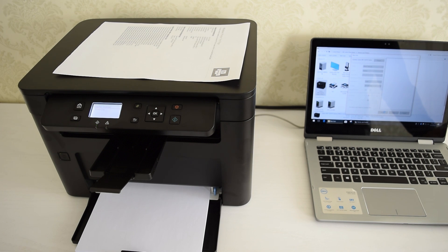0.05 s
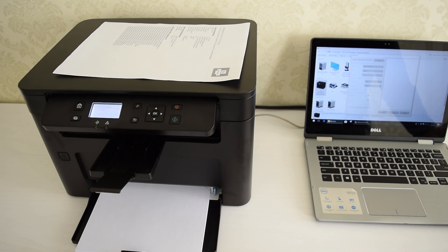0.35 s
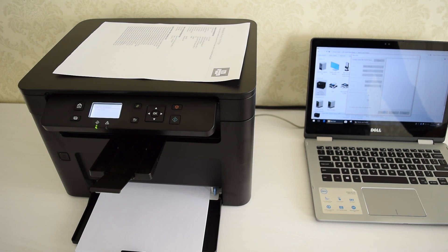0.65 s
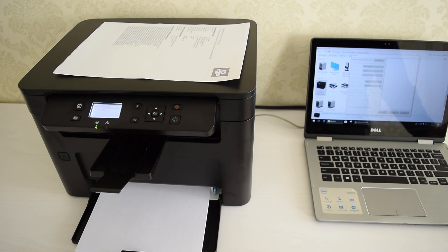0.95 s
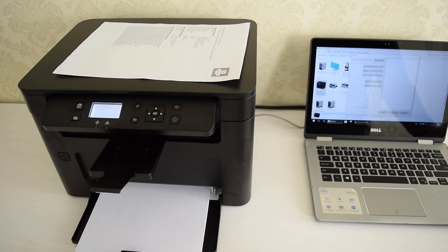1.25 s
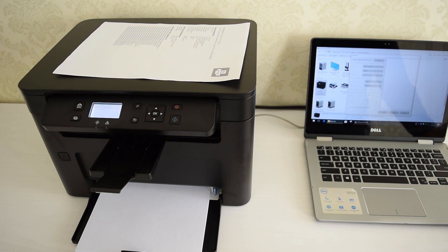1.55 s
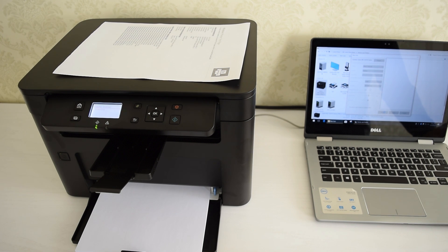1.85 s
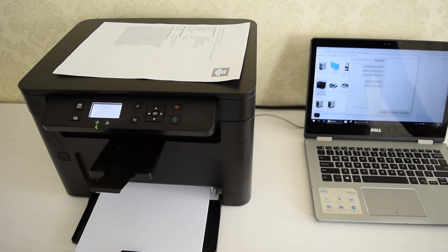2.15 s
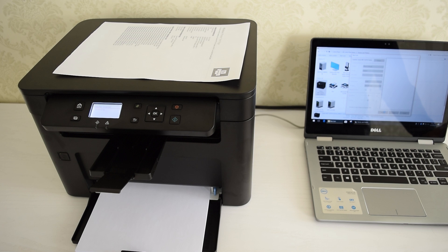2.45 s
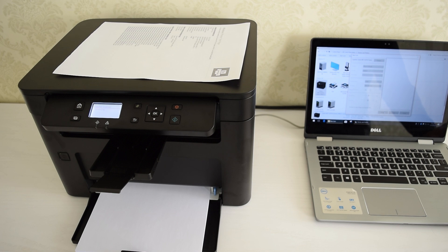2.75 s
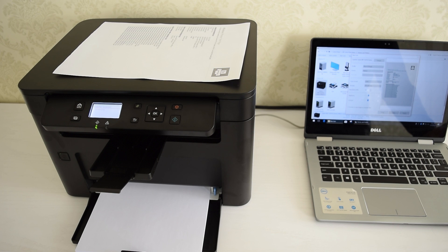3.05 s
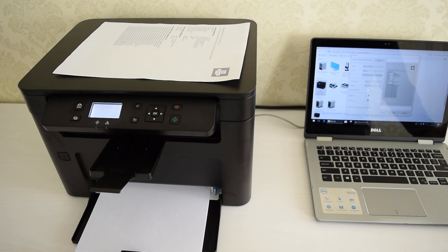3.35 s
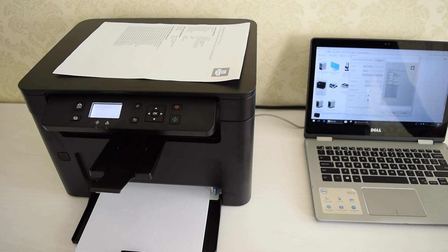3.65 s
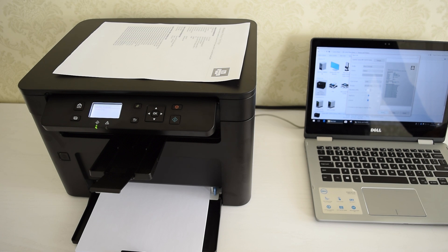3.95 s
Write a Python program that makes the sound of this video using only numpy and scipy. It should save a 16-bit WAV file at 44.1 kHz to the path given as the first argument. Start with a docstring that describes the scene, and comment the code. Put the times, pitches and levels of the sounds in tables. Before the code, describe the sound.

A desktop printer's scanner motor whines steadily over a light gear rattle. It brakes with two plastic clunks, then starts again with a lower, throbbing whir. The printer is straight ahead in a quiet room.

```python
"""A desktop printer moves its scanner carriage with a stepper motor, in a quiet room.
First the motor whines at twice its step rate over rubbing, scuffs and a gear rattle that repeats each turn.
At 1.65 s it brakes with a falling chirp; the slack gears jolt and the drive clunks twice.
From 1.8 s it chirps up to a faster, lower-sounding whir that throbs over a drone to the end.
The plastic case colours the rattle and rings under the knocks."""
import sys
import numpy as np
from scipy import signal
from scipy.fft import rfft, irfft
from scipy.io import wavfile
from scipy.ndimage import uniform_filter1d, map_coordinates

SR = 44100
rng = np.random.default_rng(int(sys.argv[2]) if len(sys.argv) > 2 else 0)


def bounce(signal):
    """Save signal as a 16-bit WAV file at the path given by the first command-line argument."""
    frames = np.transpose(np.atleast_2d(signal))
    limited = np.clip(frames, -1, 1)
    pcm = np.round(limited * 32767).astype(np.int16)
    wavfile.write(sys.argv[1], SR, pcm)


N = 176400
T = np.arange(N) / SR

SLOW_STEP_HZ, FAST_STEP_HZ, BRAKE_S = 1007.6, 1469.2, 1.649
STEPS_PER_TURN, BEATS_PER_TURN, FLUTTER_HZ = 127.16, 6, 44.8
# motor runs (start [s], run-up [s], brake at [s], braking [s], step rate [Hz])
SLOW_RUN = (-1, .05, BRAKE_S, .033, SLOW_STEP_HZ)
FAST_RUN = (1.785, .079, 5, .03, FAST_STEP_HZ)


def amp(db):
    """Decibels to gain."""
    return 10 ** (np.asarray(db) / 20)


def unit_rms(x):
    """Scales to an rms of one."""
    return x / np.sqrt(np.mean(x ** 2) + 1e-20)


def curve(rows, column=1):
    """One column of a time table, at every sample."""
    rows = np.array(rows)
    return np.interp(T, rows[:, 0], rows[:, column])


def colour(x, points):
    """Filters by (frequency [Hz], gain [dB]) points."""
    hz, db = np.transpose(points)
    bins_hz = np.fft.rfftfreq(2 * N, 1 / SR)
    gain = amp(np.interp(np.log(bins_hz + 1), np.log(hz), db))
    return irfft(rfft(x, 2 * N) * gain)[:N]


def radiate(drive, points):
    """Gives a white drive a spectral density in dB/Hz."""
    return colour(drive, points) * np.sqrt(SR / 2)


def wander(hz):
    """Unit-rms random drift, low-passed at hz."""
    rolloff = 1 + (np.fft.rfftfreq(N, 1 / SR) / hz) ** 4
    return unit_rms(irfft(rfft(rng.standard_normal(N)) / rolloff, N))


def motion(start_s, run_up_s, brake_s, braking_s, step_hz):
    """Fraction of full speed, and steps made so far."""
    speed = np.clip((T - start_s) / run_up_s, 0, 1) * np.clip(1 - (T - brake_s) / braking_s, 0, 1)
    return speed, np.cumsum(speed) * step_hz / SR


def tone(cycles, db, waver=0.18):
    """A partial fluttering in level and phase."""
    flutter = 1 + waver * (wander(FLUTTER_HZ) + 1j * wander(FLUTTER_HZ))
    return np.sqrt(2) * amp(db) * (flutter * np.exp(2j * np.pi * (cycles + rng.random()))).real


def tones(cycles, table):
    """Partials locked to one rotation."""
    return sum(tone(order * cycles, db) for order, db in table.items())


def ring(age_s, hz, db, t60_s):
    """One decaying mode, random phase."""
    return amp(db - 60 * age_s / t60_s) * np.sin(2 * np.pi * (hz * age_s + rng.random()))


def reverb(x, t60_s):
    """Diffuse room tail of unit energy."""
    t = T[:SR // 2]
    tail = rng.standard_normal(len(t)) * amp(-60 * t / t60_s)
    return signal.fftconvolve(x, tail / np.linalg.norm(tail))[:N]


# room noise (frequency [Hz], density [dB/Hz])
ROOM_SPECTRUM = [(25,-130),(50,-119),(100,-116),(150,-108),(400,-108),(1200,-99),(3000,-108),(8000,-124),(14000,-145)]
def room():
    """Steady, faint air noise."""
    return radiate(rng.standard_normal(N), ROOM_SPECTRUM)


# sliding friction (frequency [Hz], gain [dB])
RUB_EQ = [(2500,-26),(3300,-0.5),(3900,10.5),(4600,-4),(5800,-12.5),(7700,-21),(8450,-16),(9500,-20),(12000,-39)]
def carriage_rub(base_db=-58.5, swing=0.94, fade_db_per_s=6):
    """Rubbing hiss that swells with the whine and fades steadily."""
    whine_db = curve(WHINE_LEVELS)
    level_db = base_db + swing * (whine_db - whine_db.max()) - fade_db_per_s * T
    return amp(level_db) * unit_rms(colour(rng.standard_normal(N), RUB_EQ))


# carriage scuffs (time [s], level [dB])
SCUFFS = [(.03,-72),(.062,-63),(.29,-71.5),(.41,-66),(.445,-71.5),(0.539,-66.5),(0.686,-80.5),(.81,-69.5),(.93,-70),(1.185,-72.5),(1.305,-72.5),(1.44,-75.5)]
# scuff noise (frequency [Hz], gain [dB])
SCUFF_EQ = [(2500,-16.5),(3800,5.5),(5200,-1.5),(8400,-0.5),(9500,-8),(12000,-23)]
def carriage_scuffs(sigma_s=0.011):
    """Brief contacts in the slow run, each a bright swell of noise."""
    contact = sum(amp(db) * np.exp(-((T - at_s) / sigma_s) ** 2 / 2) for at_s, db in SCUFFS)
    return contact * unit_rms(colour(rng.standard_normal(N), SCUFF_EQ))


def rattle(steps, step_hz, repeat, throb, beat, grit, slip_steps=0.019, bind_turn=.49, churn_hz=9):
    """Tooth flanks scrape and tick in a pattern that returns each turn, over fresh friction noise."""
    size = int(STEPS_PER_TURN / step_hz * SR)
    turns = steps / STEPS_PER_TURN
    flanks = unit_rms(rng.standard_normal(size) * np.exp(grit * np.clip(rng.standard_normal(size), -2, 2)))
    place = (turns + slip_steps * wander(FLUTTER_HZ) / STEPS_PER_TURN) * size
    pattern = map_coordinates(flanks, [place % size], order=3, mode="grid-wrap")
    drive = np.sqrt(repeat) * pattern + np.sqrt(1 - repeat) * rng.standard_normal(N)
    # no two turns bind alike: angle and depth drift
    angle = 2 * np.pi * (turns - bind_turn + .08 * wander(churn_hz))
    bind = throb * (1 + .35 * wander(churn_hz)) * np.cos(angle)
    churn = .035 * wander(churn_hz)
    return drive * (1 + bind + churn) * (1 + beat * np.cos(BEATS_PER_TURN * angle))


# slow rattle through the case (frequency [Hz], density [dB/Hz])
SLOW_RATTLE_SPECTRUM = [(25,-130),(100,-115),(150,-101),(215,-108),(285,-101),(350,-102),(450,-91),(560,-96),(720,-92),(830,-93.5),(1050,-88),(1550,-87),(2000,-80),(2380,-85),(2750,-92),(3050,-93),(3300,-99),(3800,-99.5),(4600,-107),(5800,-114),(8450,-115),(11000,-124),(13000,-142)]
def slow_gears():
    """Light gear rattle, radiated by the case."""
    drive = rattle(SLOW_STEP_HZ * T, SLOW_STEP_HZ, repeat=0.62, throb=0.13, beat=0.17, grit=0.65)
    return radiate(drive, SLOW_RATTLE_SPECTRUM)


# fast rattle through the case (frequency [Hz], density [dB/Hz])
FAST_RATTLE_SPECTRUM = [(300,-135),(550,-104),(720,-93),(900,-85),(1100,-81),(1400,-79.5),(2100,-81.5),(2600,-84.5),(3250,-96),(3550,-94.5),(4100,-101),(4700,-99.5),(5250,-99),(5600,-108),(6100,-114),(6600,-106),(7800,-113),(8400,-105),(9500,-111),(11400,-121),(12600,-146)]
# varying mid band of the rattle (frequency [Hz], gain [dB])
MID_EQ = [(900,-91),(1400,8.5),(2600,-6.5),(4000,-26)]
# rumble under the drone (frequency [Hz], density [dB/Hz])
RUMBLE_SPECTRUM = [(25,-130),(110,-116),(170,-103),(260,-106),(330,-104),(390,-106),(455,-84),(510,-90.5),(640,-91),(760,-99),(1100,-125)]
def fast_gears():
    """Low rumble and a throbbing gear whir whose midrange softens as the carriage travels."""
    speed, steps = motion(*FAST_RUN)
    drive = rattle(steps, FAST_STEP_HZ, repeat=0.73, throb=.18, beat=0.071, grit=0.49)
    whir = radiate(drive, FAST_RATTLE_SPECTRUM)
    mid_change = (amp(curve(FAST_LEVELS, column=4)) - 1) * colour(whir, MID_EQ)
    rumble = amp(curve(DRONE_LEVELS, column=3)) * radiate(rng.standard_normal(N), RUMBLE_SPECTRUM)
    return speed * (rumble + whir + mid_change)


# backlash contacts (time [s], ring [Hz], level [dB])
JOLTS = [(1.654,1630,-41),(1.661,1230,-47),(1.663,1120,-39),(1.67,953,-52),(1.679,1210,-41),(1.811,970,-40),(1.818,1200,-40),(1.848,1350,-38),(1.872,1550,-42),(1.885,1200,-41)]
def jolts(rise_s=0.0011, t60_s=0.039):
    """Sharp speed changes throw the gears against their slack; each contact rings briefly."""
    out = np.zeros(N)
    for start_s, hz, db in JOLTS:
        age_s = np.maximum(T - start_s, 0)
        out += np.minimum(age_s / rise_s, 1) * ring(age_s, hz, db, t60_s)
    return out


# brake tick, then two double clunks (time [s], gain [dB], tilt [dB/octave], t60 [s])
KNOCKS = [(1.6555,-2.5,-0.5,.07),(1.686,10.5,1,0.13),(1.696,6,0.5,0.11),(1.784,6,1.5,0.143),(1.7875,7.5,1,0.11)]
# plastic clatter (frequency [Hz], density [dB/Hz])
CLATTER_SPECTRUM = [(40, -125), (110, -110), (200, -91.5), (350, -91.5), (480, -89), (650, -87),
                    (1200, -85.5), (1750, -81), (3100, -93), (3600, -88), (5000, -102), (6300, -108),
                    (9000, -103), (11500, -118), (15000, -140)]
# case modes (frequency [Hz], level [dB], t60 [s])
CASE_MODES = [(188,-87,.23),(485,-66,0.57),(1208,-62.5,0.41),(1713,-55.5,0.15),(2027,-56,0.28),(2770,-64,0.088),(3585,-64,0.42),(3610,-66,.2),(9668,-76,0.13)]
def clunks(rise_s=0.002, tail_db=-7, tail_t60_s=0.46):
    """Each drive knock is a short plastic clatter with a room tail and ringing case modes."""
    out = np.zeros(N)
    for start_s, db, tilt_db, t60_s in KNOCKS:
        age_s = np.maximum(T - start_s, 0)
        rise = np.minimum(age_s / rise_s, 1)
        fade = np.hypot(amp(-60 * age_s / t60_s), amp(tail_db - 60 * age_s / tail_t60_s))
        spectrum = [(hz, level + tilt_db * np.log2(hz / 2000)) for hz, level in CLATTER_SPECTRUM]
        modes = sum(ring(age_s, *mode) for mode in CASE_MODES)
        clatter = radiate(rise * fade * rng.standard_normal(N), spectrum)
        out += amp(db) * (clatter + rise * modes)
    return out


def ramp_chirp(run, db, floor_hz=880, resonance_hz=1650, sigma_hz=850, room_db=-4):
    """On a speed ramp the rotor shudders and the whine sweeps through the case resonance."""
    speed, steps = motion(*run)
    whine_hz = 2 * run[-1] * speed
    ramping = uniform_filter1d(((whine_hz > floor_hz) & (speed < 1)) * 1., 300)
    resonance = np.exp(-((whine_hz - resonance_hz) / sigma_hz) ** 2 / 2)
    chirp = ramping * resonance * tone(2 * steps, db, waver=0.36)
    return chirp + amp(room_db) * reverb(chirp, t60_s=.2)


# fast-run drone (time [s], lower tone [dB], upper tone [dB], rumble gain [dB])
DRONE_LEVELS = [(1.9,-70.5,-57,-1),(2.6,-70.5,-56.5,-4),(3.3,-69,-59.5,-3),(3.8,-65.5,-57,2.5),(4,-63,-60.5,3.5)]
def drone(turns, orders=(36, 45)):
    """Two low tones locked to the gear."""
    return sum(tone(k * turns, curve(DRONE_LEVELS, i + 1), waver=0.15) for i, k in enumerate(orders))


# fast run (time [s], step tone [dB], mesh tone [dB], hum [dB], rattle mid control [dB])
FAST_LEVELS = [(1.85,-47.5,-68,-76,1),(2.0,-51,-80,-72,-0.5),(2.15,-53.5,-64,-83,0),(2.6,-51.5,-59,-85,0),(2.85,-58.5,-55.5,-100,0.5),(3.1,-58.5,-52,-86,-1),(3.5,-54.5,-51,-92,-2),(3.67,-56,-52,-77,-3.5),(4,-55,-53,-70,-4)]
# motor overtones (order [cycles/step], level [dB])
FAST_STEP_TONES = {2:-62, 4:-85.5, 7:-86.5, 8:-91, 9:-103, 10:-94}
# gear tones (order [cycles/turn], level [dB])
FAST_GEAR_TONES = {14.7:-85, 30:-80.5, 40:-73.5, 52:-69.5, 54:-76.5, 57:-76.5, 108:-61, 116:-70.5,
                   138:-64.5, 141:-64, 153:-63, 167:-66, 180:-61.5, 186:-65, 225:-65, 299:-72.5, 400:-78}
def fast_motor(mesh_order=90, hum_order=18, sideband_db=-4.5, rise_s=.055):
    """A rising chirp, then step and gear tones whose levels shift as the carriage travels."""
    _, steps = motion(*FAST_RUN)
    turns = steps / STEPS_PER_TURN
    step_db, mesh_db, hum_db = (curve(FAST_LEVELS, column) for column in (1, 2, 3))
    motor = tone(steps, step_db) + tones(steps, FAST_STEP_TONES)
    mesh = tone(mesh_order * turns, mesh_db)
    hum = tone(hum_order * turns, hum_db)
    sideband = tone((mesh_order + BEATS_PER_TURN) * turns, mesh_db + sideband_db)
    running = motor + mesh + hum + sideband + drone(turns) + tones(turns, FAST_GEAR_TONES)
    full_speed_s = FAST_RUN[0] + FAST_RUN[1]
    build_up = np.clip((T - full_speed_s) / rise_s, 0, 1)
    return build_up * running + ramp_chirp(FAST_RUN, db=-48)


# whine at twice the step rate (time [s], level [dB])
WHINE_LEVELS = [(0.0, -31.5), (0.044, -32.5), (0.114, -37.5), (0.27, -34), (0.556, -32.5), (0.624, -38.5),
                (0.67, -33.5), (0.734, -35), (0.794, -32), (0.872, -35), (0.918, -31.5), (1.08, -34.5),
                (1.116, -37.5), (1.184, -33), (1.244, -34.5), (1.304, -32), (1.368, -35), (1.424, -32.5),
                (1.65, -39)]
# motor overtones (order [cycles/step], level [dB])
SLOW_STEP_TONES = {3:-71.5, 4:-69, 6:-84.5, 8:-81.5, 9:-83, 11:-94.5, 14:-95}
# gear tones (order [cycles/turn], level [dB])
SLOW_GEAR_TONES = {18:-92.5, 36:-82, 54:-81, 90:-72, 141:-85, 147:-69, 156:-66, 180:-69.5, 218:-71.5,
                   236:-61.5, 249:-61, 270:-63.5, 294:-67, 300:-61}
def slow_motor(whine_t60_s=.085):
    """A strong whine with step and gear tones; on braking it rings out under a falling chirp."""
    speed, steps = motion(*SLOW_RUN)
    whine_db = curve(WHINE_LEVELS) - 60 * np.maximum(T - BRAKE_S, 0) / whine_t60_s
    whine = tone(2 * SLOW_STEP_HZ * T, whine_db, waver=0.046)
    step_tones = tone(steps, db=-60, waver=0.29) + tones(steps, SLOW_STEP_TONES)
    gear_tones = tones(steps / STEPS_PER_TURN, SLOW_GEAR_TONES)
    return whine + speed ** 2 * (step_tones + gear_tones) + ramp_chirp(SLOW_RUN, db=-46)


def noises(coast_t60_s=0.93):
    """Room, friction, gears and knocks; the slow run's noise dies away after braking."""
    coast = amp(-60 * np.maximum(T - BRAKE_S, 0) / coast_t60_s)
    slow_run = coast * (slow_gears() + carriage_scuffs() + carriage_rub())
    return slow_run + fast_gears() + jolts() + clunks() + room()


# stereo width (frequency [Hz], side gain [dB])
SIDE_EQ = [(30,-32.5),(60,-13),(150,-14),(400,-13.5),(1000,-21.5),(2000,-16.5),(4000,-10.5),(8000,-7.5),(12000,-6)]
def scene():
    """Printer straight ahead; scattered sound widens mainly the treble."""
    mid = slow_motor() + fast_motor() + noises()
    side = colour(noises(), SIDE_EQ)
    return np.array([mid + side, mid - side])


def record(dry):
    """Band limit, with soft ends."""
    cutoff_hz, fade_s = 14900, .003
    fade = np.clip(np.minimum(T, T[-1] - T) / fade_s, 0, 1)
    lowpass = signal.firwin(511, cutoff_hz, window=("kaiser", 9), fs=SR)
    return signal.oaconvolve(dry * fade, lowpass[None], "same")


dry = scene()
out = record(dry)
bounce(out)
```